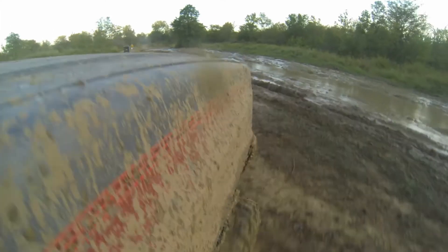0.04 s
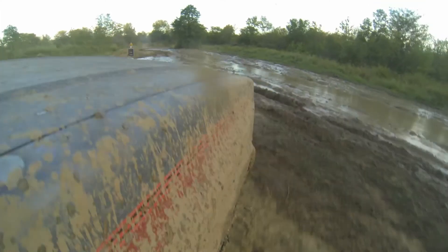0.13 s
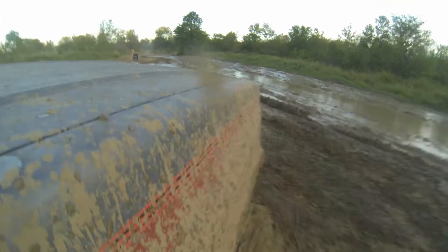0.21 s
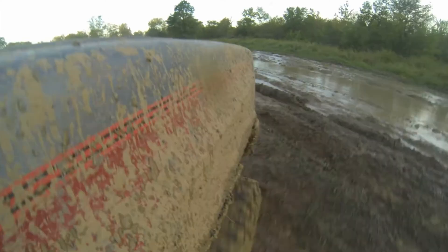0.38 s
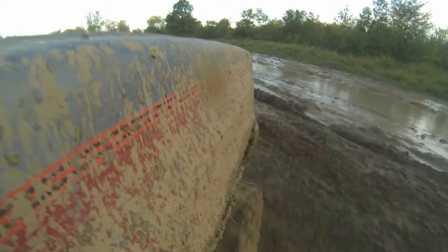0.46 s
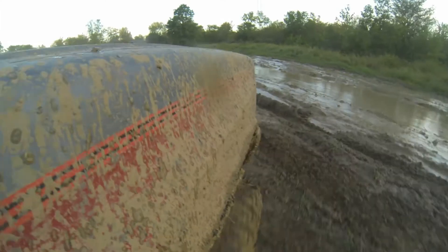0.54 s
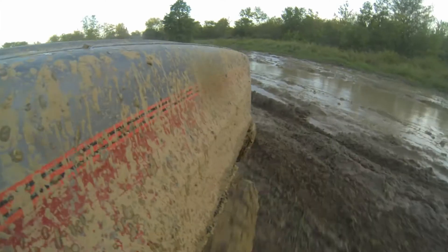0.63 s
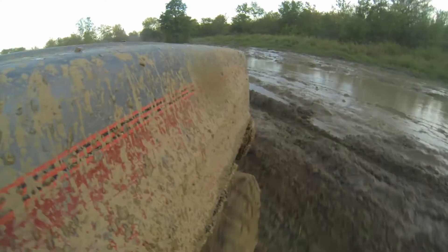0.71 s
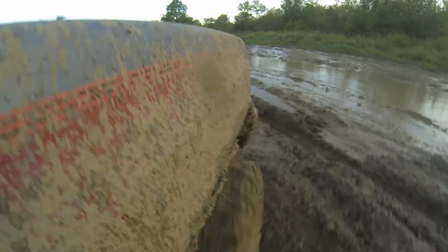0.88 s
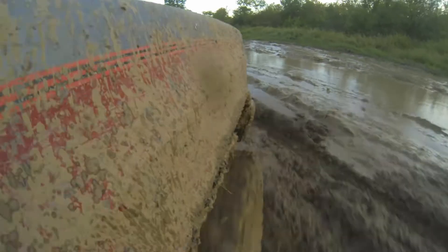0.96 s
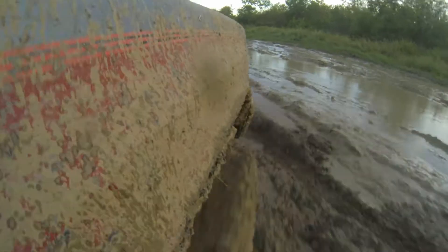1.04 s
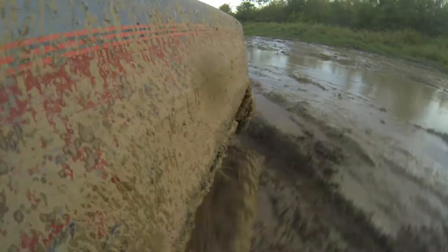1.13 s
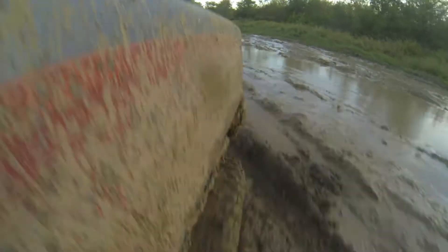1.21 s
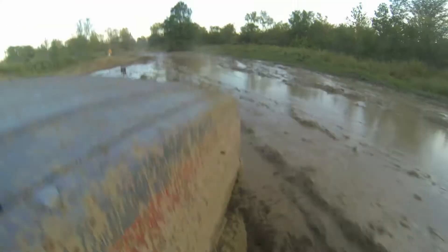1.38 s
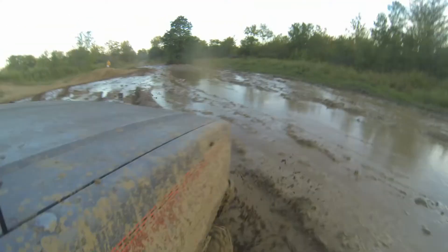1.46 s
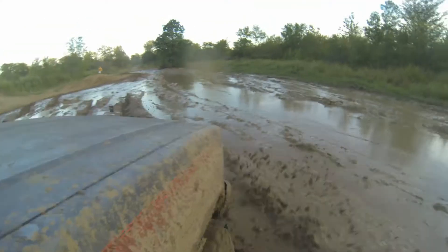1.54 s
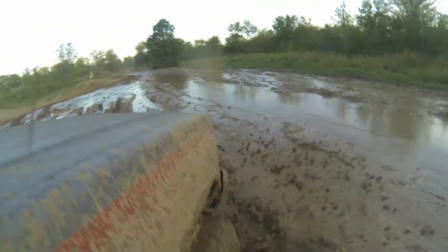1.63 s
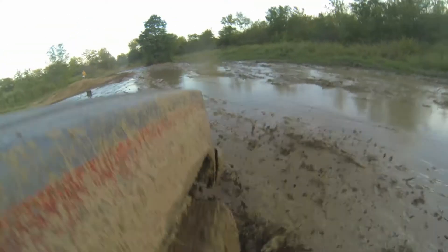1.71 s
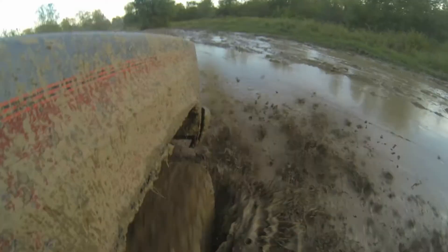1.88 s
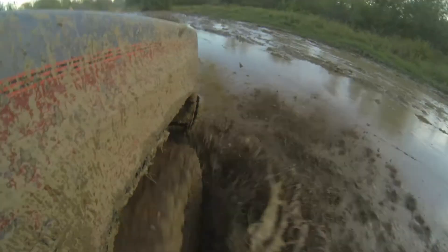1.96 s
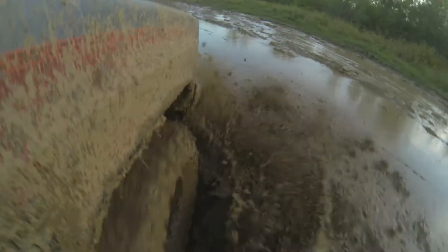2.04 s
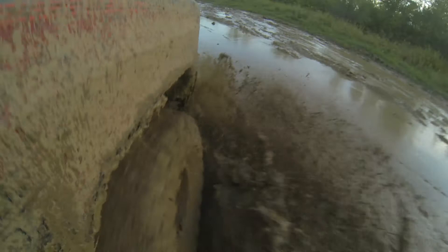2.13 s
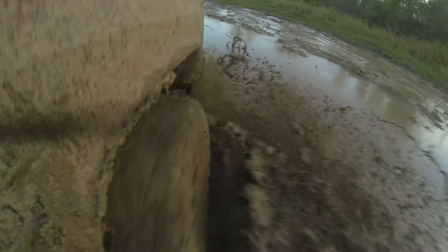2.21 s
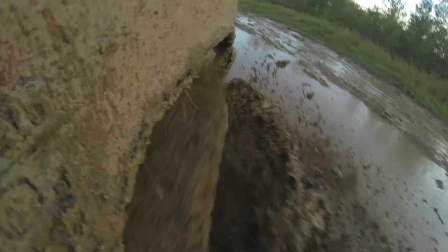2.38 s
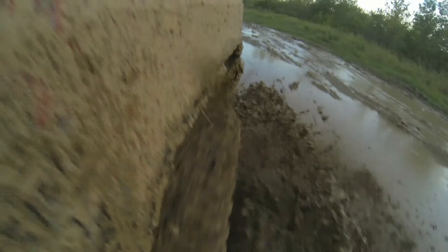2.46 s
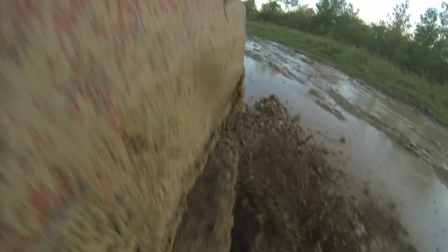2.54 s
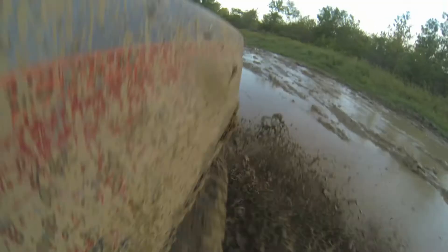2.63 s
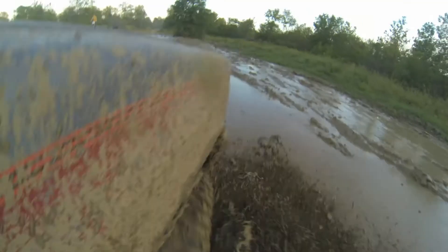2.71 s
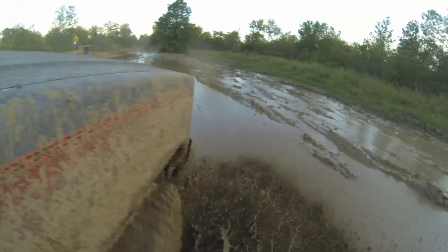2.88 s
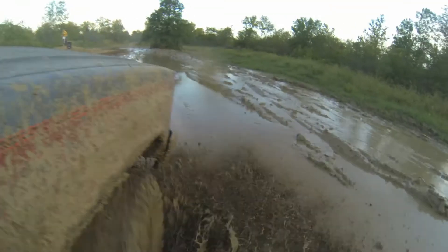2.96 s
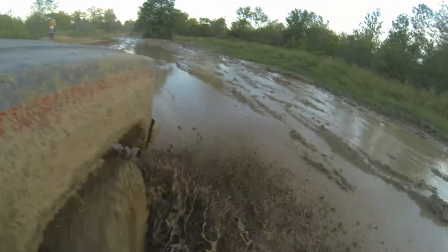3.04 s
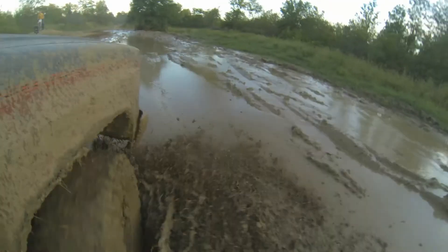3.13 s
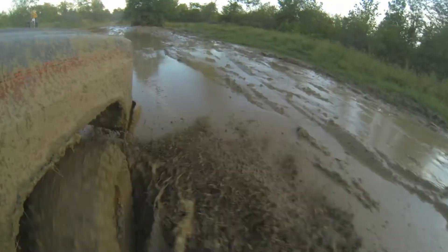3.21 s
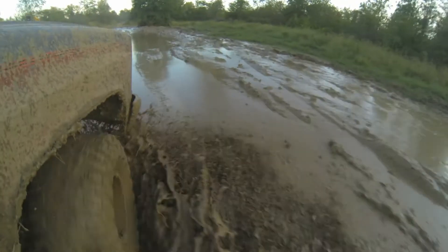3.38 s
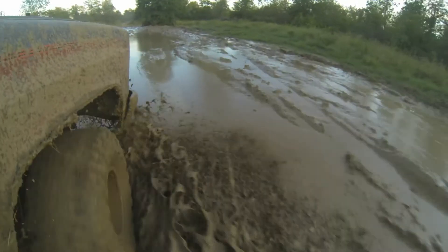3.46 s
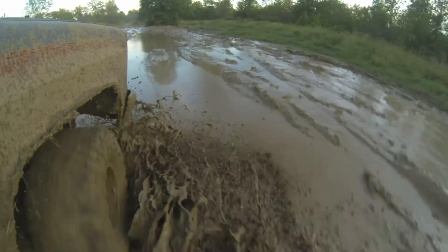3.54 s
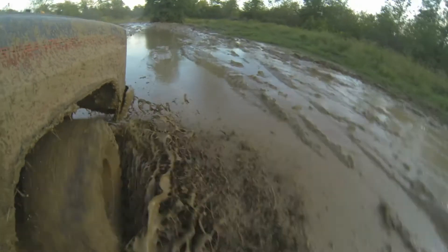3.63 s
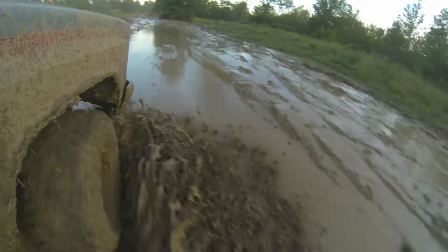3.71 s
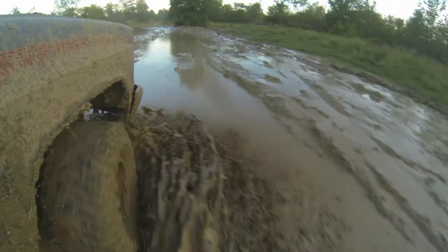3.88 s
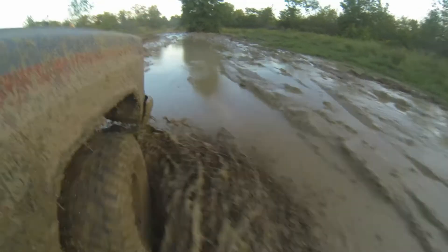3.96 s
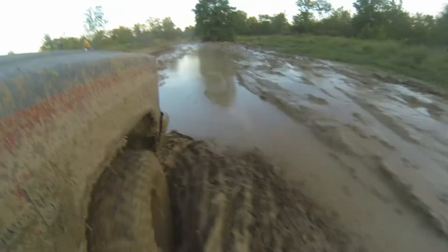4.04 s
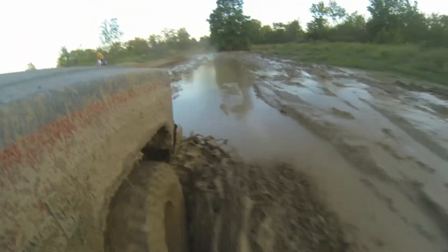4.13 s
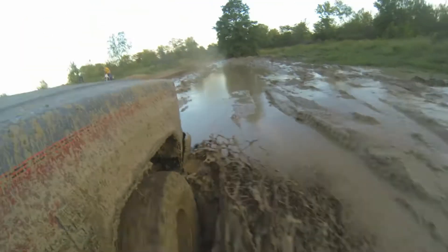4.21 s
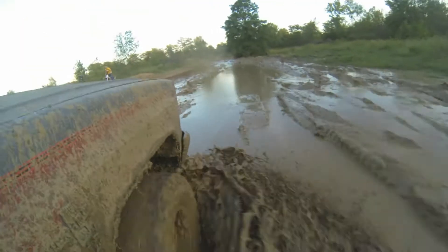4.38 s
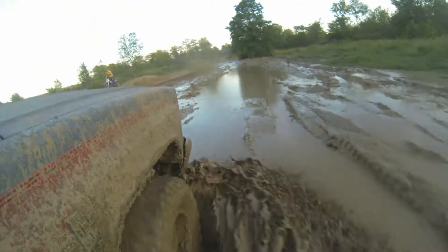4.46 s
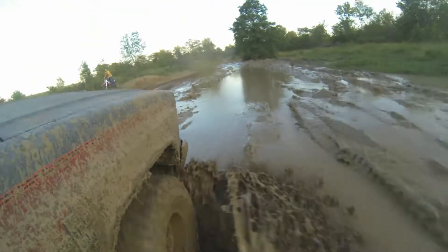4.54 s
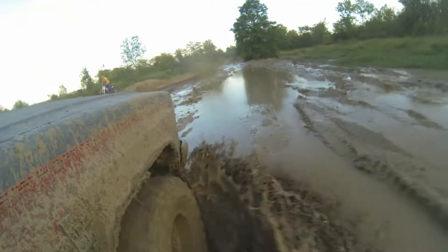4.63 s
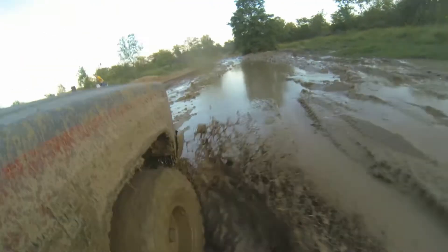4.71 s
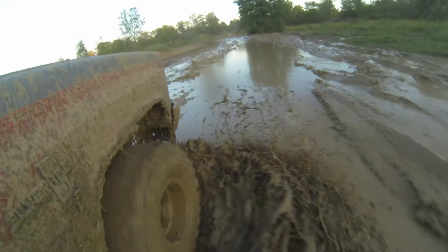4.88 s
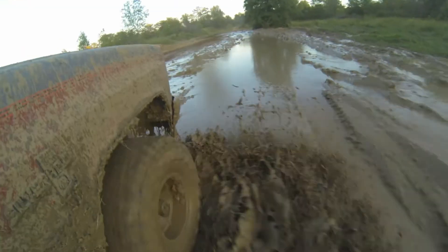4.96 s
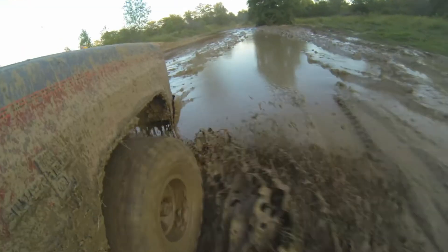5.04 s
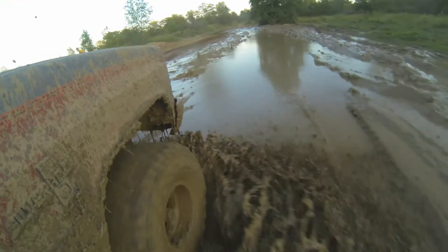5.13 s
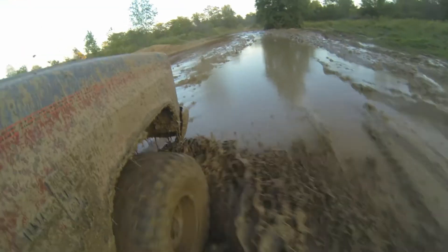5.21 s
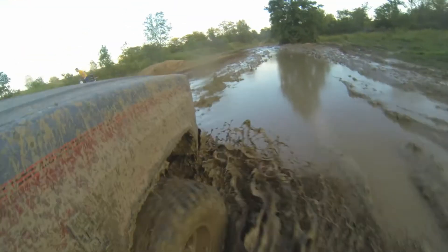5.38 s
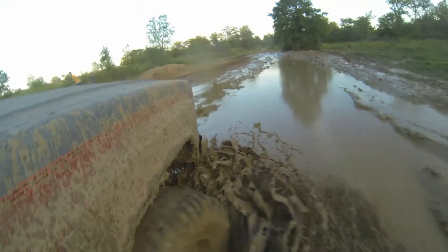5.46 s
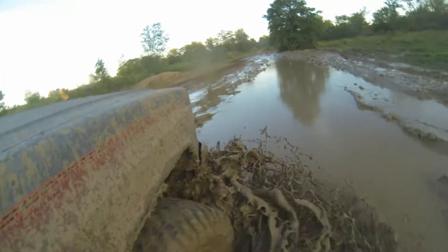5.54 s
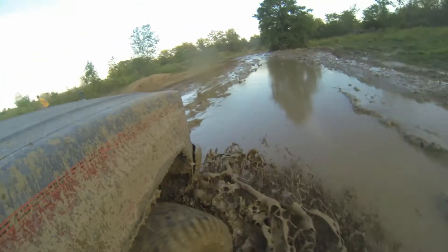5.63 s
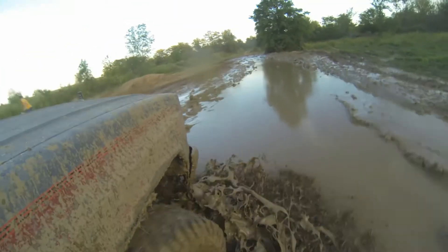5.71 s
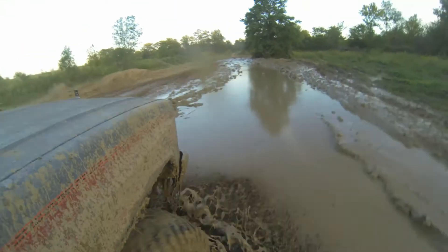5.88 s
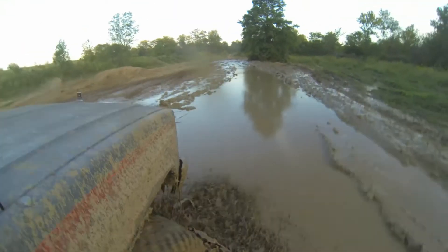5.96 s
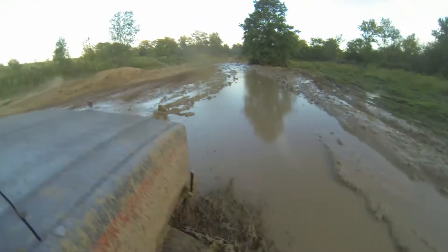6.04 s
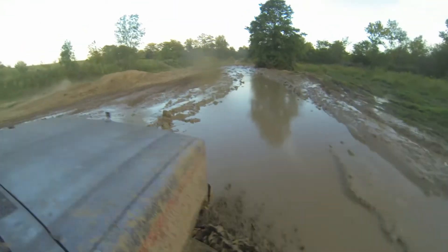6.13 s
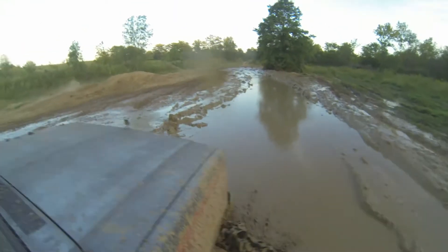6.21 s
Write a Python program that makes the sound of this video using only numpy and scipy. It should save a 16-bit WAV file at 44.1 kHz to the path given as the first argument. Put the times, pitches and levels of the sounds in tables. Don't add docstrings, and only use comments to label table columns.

```python
import sys
import numpy as np
from scipy import signal
from scipy.fft import rfft, irfft
from scipy.io import wavfile
from scipy.ndimage import uniform_filter1d

SR = 44100
rng = np.random.default_rng(int(sys.argv[2]) if len(sys.argv) > 2 else 0)


def level_to_linear(level):
    exponent = np.asarray(level, float) / 20
    return 10 ** exponent


def unload_wav(signal):
    wavfile.write(
        sys.argv[1],
        SR,
        np.round(np.clip(np.atleast_2d(signal).T, -1, 1) * 32767).astype(np.int16),
    )


N = 277830
T = np.arange(N) / SR

# [t/s, peak level/dB]
GUSTS = [(0.12, -10), (0.527, -21), (0.732, -21), (0.858, -8), (1.161, -14), (1.436, -12.5), (1.732, -10),
         (2.137, -28), (2.476, -12.5), (2.595, -13), (2.801, -26), (2.946, -35), (3.575, -30), (4.539, -28),
         (5.09, -16), (5.224, -16), (5.412, -16), (5.551, -13.5), (5.809, -14), (5.932, -11)]
# [t/s, level/dB]
BREEZE = [(0, -21.5), (2.0, -24.5), (3.2, -23), (4.5, -25), (6.3, -29)]
GUST_DB, GUST_RISE_S, GUST_DECAY_S = 2, 0.038, 0.075

# [f/Hz, level/dB per Hz]
HOUSING = [(350, -34), (600, -16), (762, -17.5), (935, -17.5), (1480, 4.5), (1580, 0), (1880, -12),
           (2190, -4), (2480, -12.5), (3410, -8), (4340, -27), (5000, -11.5), (6500, -51), (11000, -120)]
# [f/Hz, level/dB per Hz]
MIST = [(2470, -41), (4200, -28), (4410, -17), (4650, -1.5), (4900, 3), (6030, -2.5), (8220, -3.5),
        (9190, -10.5), (10800, -10.5), (11900, -17.5), (13200, -14.5), (15000, -25.5)]

# [t/s, slosh level/dB]
SPRAY = [(0.0, -42.5), (0.21, -40.5), (1.03, -38), (1.21, -37), (1.74, -29), (2.17, -20), (2.37, -32),
         (2.6, -25), (3.03, -18), (3.6, -21), (3.75, -18.5), (5.02, -23), (5.61, -21), (6.3, -20.5)]
# [t/s, peak level/dB, length/s, fine spray relative to the surge/dB]
SURGES = [(0.173, -35.5, 0.042, -11), (0.262, -35.5, 0.057, -6), (1.095, -35, 0.1, -1.5),
          (1.286, -28, 0.048, -3), (1.534, -39.5, 0.081, 8.5), (1.78, -28, 0.028, -10),
          (2.023, -21.5, 0.063, -2), (2.14, -19, 0.032, -3), (2.301, -20, 0.11, 0),
          (2.61, -26.5, 0.06, 1.5), (2.768, -27, 0.025, 1.5), (2.903, -23.5, 0.1, 4.5),
          (3.106, -21.5, 0.067, 7.5), (3.567, -18.5, 0.01, .1), (4.163, -30, 0.088, 9),
          (4.524, -28.5, 0.086, 5.5), (5.263, -19.5, 0.093, -6), (5.492, -23, 0.047, 2.5),
          (5.605, -25.5, 0.021, 2.5), (5.722, -19.5, 0.092, 2), (5.831, -19, 0.021, 3),
          (6.195, -17.5, 0.013, -5)]
# [t/s, peak level/dB, brightness/dB]
CLODS = [(0.149, -28.5, -34), (0.9343, -54, -19), (1.2475, -19.5, -22.5), (1.296, -23, -33),
         (1.4445, -30, -24), (1.7559, -39, -24), (1.9924, -13.5, -22.5), (2.2142, -15.5, -30),
         (2.301, -17, -34), (2.528, -26, -26), (2.6879, -37, -25), (2.7571, -26, -24), (3.1375, -9, -28),
         (3.187, -9.5, -34), (3.4909, -15.5, -33), (3.543, -40, -29), (3.675, -26, -27), (3.939, -16, -23),
         (4.288, -16.5, -24), (4.742, -17, -29), (4.926, -15.5, -25), (5.5746, -25, -11.5),
         (5.6187, -12.5, -28), (5.8036, -12, -20.5), (5.973, -15.5, -29), (6.0474, -21, -30),
         (6.0715, -13, -31), (6.115, -16, -30), (6.1957, -14, -35), (6.2457, -13, -28)]
# [t/s, peak level/dB, f/Hz]
PLOPS = [
    (2.742, -27.5, 670),
    (2.935, -30, 950),
    (3.018, -32, 660),
    (3.4, -23, 880),
]
PLOP_RISE_S, PLOP_DECAY_S, PLOP_GLIDE = 0.004, 0.013, 1.4
SPATTER_DB, SPATTER_SLOPE = -6, 1.087
MIST_DB, MIST_SLOPE = -33, 0.73
MIST_THROTTLE_DB, MIST_PUFF_DB = 4.5, 3
WATER_S, DRY_DB = 0.97, -22
THUD_DB, COAST_DB = -16, -4.5

# [t/s, level/dB]
INTAKE = [(0, -54.5), (1.1, -55.5), (2.1, -51.5), (6.3, -54.5)]
VALVE_PHASE = 0.3
TICK_DB, TICK_SCATTER_DB, TICKS_END_S = -42.5, 2, 1.85

# [pressed t/s, released t/s, depth 0-1]
PEDAL = [
    (1.4, 1.76, 0.24),
    (1.78, 2.438, 0.96),
    (2.66, 5.08, 1.0),
    (5.337, 5.54, 1),
    (5.58, 6.4, 0.81),
]
PEDAL_RISE_S, PEDAL_FALL_S = 0.045, 0.017
# [t/s, f/Hz]
IDLING = [(0.0, 71.0), (0.9, 70.0), (1.2, 66.3), (1.74, 68.0)]
FIRST_REV = [(1.98, 81.4), (2.2, 102.7), (2.33, 110.3), (2.43, 106.9), (2.62, 63.5)]
LONG_REV = [(2.8, 83.4), (3.02, 90.4), (3.2, 107.3), (3.53, 117.5), (3.98, 124.4), (4.25, 121.8),
            (4.66, 126.5), (5.05, 105.1), (5.23, 71.0)]
LAST_REV = [(5.34, 65.0), (5.45, 73.5), (5.58, 65.4), (5.8, 93.7), (6.05, 112.7), (6.3, 128.0)]
IDLE_HZ, TOP_HZ = 66, 125
CYCLE_START = 0.66
CYLINDER_DB = [6.5, -1.5, -1.5, 6, -1, 7, 4, -1]
# [f/Hz, width/Hz, level/dB]
EXHAUST = [(77.5, 48.6, -5), (118, 38.4, -4.5)]
# [f/Hz, width/Hz, level/dB]
TAILPIPE = [(143.2, 35, 4), (197.3, 38, -7), (275, 125, -14.5)]
# [f/Hz, width/Hz, level/dB]
MANIFOLD = [(118.2, 28, -0.5), (100, 46, -12.5)]
# [f/Hz, width/Hz, level/dB]
GAS = [(156, 34, -2), (260, 67, -0.5), (411, 45, -0.5), (594, 370, -13)]
# [firing f/Hz, level/dB]
PIPE_GAIN = [(64, 0.5), (78, -0.5), (93, -3), (108, 1.5), (125, 0.5)]
# [t/s, level/dB]
OVERRUN = [(5.12, -70), (5.2, -40), (5.26, -30), (5.34, -32), (5.42, -40), (5.5, -70)]
# at idle, gain at full throttle, gain from throttle at top speed,
# gain per 100 Hz/s of climb, gain when coasting at top speed
TONE_DB = (-29, 9, 3, -0.3, 5)
LOPE_DB = (-29.5, 8.5, -7.5, -1.3, -4)
CHUFF_DB = (-24.5, 4.5, -8.5, -2, -4.5)
ROAR_DB = (-44.5, 4, 6.5, 6.5, 7)
RASP_DB = (-62, 5, 18.5, -11, 2)


def unit(x):
    return x / np.sqrt(np.mean(x ** 2))


def curves(table):
    s, *columns = np.transpose(table)
    return [np.interp(T, s, c) for c in columns]


def noise():
    return rng.standard_normal(N)


def walk(rate):
    hold = int(SR / rate)
    steps = noise()[np.arange(N) // hold]
    return unit(uniform_filter1d(uniform_filter1d(steps, hold), hold))


def band(x, hz, width_hz):
    return signal.lfilter(*signal.iirpeak(hz, hz / width_hz, fs=SR), x)


def cut(x, hz, kind, order=4):
    return signal.sosfilt(signal.butter(order, hz, kind, fs=SR, output="sos"), x)


def ring(x, modes):
    total = np.zeros(N)
    for k, (hz, width, db) in enumerate(modes):
        total += (-1) ** k * level_to_linear(db) * band(band(x, hz, width), hz, width)
    return unit(total)


def colour(x, table, size=2048):
    hz, db = np.transpose(table)
    grid = np.maximum(np.fft.rfftfreq(size, 1 / SR), 1)
    cep = irfft(np.interp(np.log(grid), np.log(hz), db) * np.log(10) / 20)
    cep[1:size // 2] *= 2
    cep[size // 2 + 1:] = 0
    return signal.fftconvolve(x, irfft(np.exp(rfft(cep))))[:N]


def bursts(table, decay_s, rise_s):
    env = np.zeros(N)
    for s, db in table:
        span = slice(int(s * SR), int((s + 0.5) * SR))
        age = np.clip(T[span] - s, 0, 1)
        env[span] += level_to_linear(db) * (1 - np.exp(-age / rise_s)) * np.exp(-age / decay_s)
    return env


def gusts():
    breeze = level_to_linear(curves(BREEZE)[0])
    return 20 * np.log10(breeze + level_to_linear(GUST_DB) * bursts(GUSTS, GUST_DECAY_S, GUST_RISE_S))


def wind(rumble_db):
    rumble = unit(cut(band(noise(), 24, 26), 43, "low", order=6))
    return rumble * level_to_linear(rumble_db - 3.5 + 0.6 * walk(9))


def plops():
    total = np.zeros(N)
    for s, db, hz in PLOPS:
        age = T - s
        bubble = np.sin(2 * np.pi * hz * age * (1 + PLOP_GLIDE * age))
        total += bursts([(s, db + 5.5)], PLOP_DECAY_S, PLOP_RISE_S) * bubble
    return total


def clods():
    s, db, bright_db = np.transpose(CLODS)
    knocks = np.zeros((2, N))
    knocks[:, (s * SR).astype(int)] = level_to_linear([db, db + bright_db])
    body, shell = colour(knocks[0], HOUSING), colour(knocks[1], MIST)
    knock = body * knocks[0].max() / body.max() + shell * knocks[1].max() / shell.max()
    wet = noise()
    dull = unit(colour(wet, HOUSING)) * bursts(zip(s, db + 2), 0.0058, 0.00046)
    bright = unit(colour(wet, MIST)) * bursts(zip(s, db + bright_db + 9.5), 0.0066, 0.0007)
    return level_to_linear(0.5) * knock + dull + bright


def drumming(surge):
    return level_to_linear(THUD_DB) * surge * ring(noise() * level_to_linear(4.5 * walk(30)), [(307, 200, 3.5), (632, 480, -1)])


def churn(opening, firings, hz):
    flow = level_to_linear(curves(SPRAY)[0])
    surge, bright = np.zeros((2, N))
    for s, db, length, fine_db in SURGES:
        swell = level_to_linear(db) * np.exp(-((T - s) / length) ** 2)
        surge += swell
        bright += level_to_linear(fine_db) * swell
    slosh_db = 20 * np.log10(np.hypot(flow, surge))
    over_db = 20 * np.log10(np.hypot(flow, bright)) + 20
    age = (firings / 8 - VALVE_PHASE + 0.06) % 1
    puff = uniform_filter1d(2.85 * np.exp(-age / 0.33), SR // 200) - 1
    puff += 0.74 * np.clip((95 - hz) / 30, 0, 1) * np.cos(2 * np.pi * firings)
    spin = uniform_filter1d(opening, SR // 6)
    mist_db = MIST_DB + MIST_SLOPE * over_db + DRY_DB * (T < WATER_S)
    mist_db += spin * (MIST_THROTTLE_DB + MIST_PUFF_DB * puff)
    return slosh_db, SPATTER_DB + SPATTER_SLOPE * over_db - 20.5, mist_db - 18.5, surge


def flecks(count=16):
    hits = rng.standard_normal((count, N)) * (rng.random((count, N)) < 30 / SR)
    pitches = np.geomspace(1250, 11000, count)
    return unit(sum(band(hit, hz, hz / 13) / hz ** 0.73 for hit, hz in zip(hits, pitches)))


def tyres(slosh_db, spatter_db, mist_db, deep_db, firings):
    drops = noise() * (1 + 0.13 * np.cos(2 * np.pi * firings))
    drops += 2.27 * noise() * (rng.random(N) < 500 / SR)
    drops += 0.65 * signal.lfilter([1, -0.8], 1, flecks())
    drops *= level_to_linear(0.4 * walk(15) + 1.09 * walk(45))
    heard = colour(drops, HOUSING)
    slosh = unit(cut(heard, 1655, "low", order=8)) * level_to_linear(slosh_db + 0.1 * walk(30))
    slosh = cut(slosh, 1043, "high") + level_to_linear(deep_db) * cut(slosh, 764, "low")
    spatter = unit(cut(cut(heard, 2142, "high", order=8), 4150, "low", order=8))
    spatter *= level_to_linear(spatter_db + 1.86 * walk(38))
    fine = colour(drops + 0.38 * noise(), MIST)
    fine /= np.std(cut(fine, 9080, "high", order=8))
    drizzle = cut(fine, 6970, "low") * level_to_linear((mist_db + spatter_db - 22.5) / 2 + 1.2 * walk(50))
    mist = cut(fine, 8780, "high") * level_to_linear(mist_db + 1.4 * walk(55))
    return slosh + spatter + drizzle + mist


def wavering(hz, width_hz):
    flutter = cut(noise(), width_hz / 2, "low") + 1j * cut(noise(), width_hz / 2, "low")
    return unit(np.real(flutter * np.exp(2j * np.pi * np.cumsum(hz) / SR)))


def ticks(firings):
    s = T[np.flatnonzero(np.diff(np.floor(firings / 8 - VALVE_PHASE)))]
    db = TICK_DB + TICK_SCATTER_DB * rng.standard_normal(len(s))
    return [row for row in zip(s, db) if row[0] < TICKS_END_S]


def valve_gear(hiss_db, firings):
    centre_hz = 6620 + 150 * np.cos(2 * np.pi * (firings / 8 - 0.08)) + 60 * walk(25)
    hiss = wavering(centre_hz, 600) * level_to_linear(1.8 * walk(60))
    overtone = wavering(2 * centre_hz, 1100) * level_to_linear(-18)
    grit = noise() * level_to_linear(1.5 * walk(200))
    metal = ring(grit, [(7750, 650, 0), (10200, 700, -16)])
    leaks = ticks(firings)
    early = [(s - 0.028, db + 2) for s, db in leaks]
    spit = bursts(leaks, 0.011, 0.003) + bursts(early, 0.022, 0.025)
    return level_to_linear(hiss_db + 0.5) * (hiss + overtone) + level_to_linear(-3) * metal * spit


def swing(s, span):
    return 0.5 + 0.5 * np.tanh((T - s) / span)


def throttle():
    return sum(depth * swing(down, PEDAL_RISE_S) * (1 - swing(up, PEDAL_FALL_S)) for down, up, depth in PEDAL)


def effort(law_db, opening, hz):
    idle_db, open_db, fast_db, climb_db, coast_db = law_db
    speed = (hz - IDLE_HZ) / (TOP_HZ - IDLE_HZ)
    climb = np.clip(uniform_filter1d(np.gradient(hz) * SR / 100, SR // 8), 0, 1)
    driven_db = opening * (open_db + fast_db * speed + climb_db * climb)
    return idle_db + driven_db + coast_db * speed * (1 - opening)


def engine(hz, tone_db, lope_db, chuff_db, roar_db, rasp_db, burble_db):
    firings = 8 * CYCLE_START + np.cumsum(hz) / SR
    at = np.flatnonzero(np.diff(np.floor(firings)))
    cylinder = np.floor(firings[at + 1]).astype(int) % 8
    strength = level_to_linear(np.array(CYLINDER_DB))
    scatter = level_to_linear(1.38 * rng.standard_normal(len(at)))
    banks, strong = np.zeros((2, N))
    banks[at] = strength[cylinder] * scatter - 0.72 * strength.mean()
    strong[at] = (cylinder == 0) * scatter
    turn = 2 * np.pi * firings
    tone = np.sqrt(2) * (np.sin(turn) + level_to_linear(-20 + 2 * walk(6)) * np.sin(2 * turn))
    tone *= level_to_linear(tone_db + 0.6 * walk(14))
    tail_db = -1.0 + 0.46 * np.minimum(hz - 84, 0)
    lope = ring(banks, EXHAUST) + level_to_linear(tail_db) * ring(banks, TAILPIPE)
    answer = np.roll(ring(strong, [(200.3, 45, 0)]), int(0.01903 * SR))
    chuff = ring(strong, MANIFOLD) + level_to_linear(-19.5) * answer
    load = np.exp(0.84 * np.cos(turn / 8 - 2.5))
    rasp = unit(load * (np.sin(turn * 28 / 8) + 0.45 * np.sin(turn * 38 / 8)))
    rasp *= level_to_linear(rasp_db + 0.76 * walk(7.5))
    burble = np.sqrt(2) * (np.sin(3 * turn) + 0.3 * np.sin(4 * turn) + 0.25 * np.sin(5 * turn))
    burble *= level_to_linear(burble_db + 1.0 + 2.5 * np.cos(turn / 2))
    gas = noise() * level_to_linear(1.8 * walk(24.945))
    roar = unit(sum(level_to_linear(db) * band(gas, f, width) for f, width, db in GAS))
    pipes = level_to_linear(lope_db) * lope + level_to_linear(chuff_db) * chuff
    return tone + pipes + rasp + burble + level_to_linear(roar_db - 2.5) * roar, firings


def scene():
    hz, opening = curves(IDLING + FIRST_REV + LONG_REV + LAST_REV)[0], throttle()
    laws = (TONE_DB, LOPE_DB, CHUFF_DB, ROAR_DB, RASP_DB)
    tone_db, *levels_db = [effort(law, opening, hz) for law in laws]
    tone_db = tone_db + opening * np.interp(hz, *np.transpose(PIPE_GAIN))
    motor, firings = engine(hz, tone_db, *levels_db, *curves(OVERRUN))
    *water_db, surge = churn(opening, firings, hz)
    water = tyres(*water_db, COAST_DB * (1 - opening), firings) + drumming(surge)
    mud = clods() + plops()
    mix = wind(gusts()) + mud + water + valve_gear(*curves(INTAKE), firings) + motor
    return mix[None, :]


def band_limit(x):
    return signal.sosfilt(signal.butter(12, 15150, fs=SR, output="sos"), x)


def record(dry):
    rounded = np.tanh(0.6 * dry) / 0.58
    return band_limit(rounded)


dry = scene()
out = record(dry)
unload_wav(out)
```